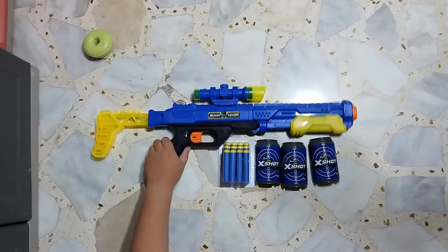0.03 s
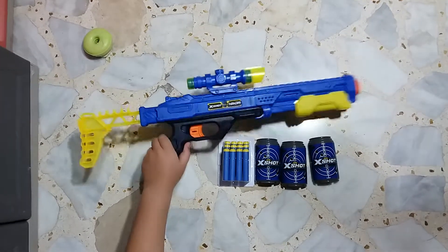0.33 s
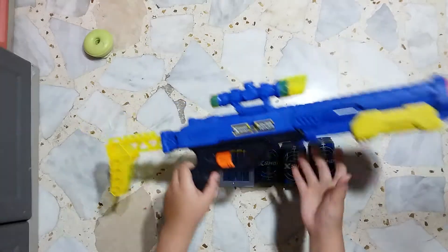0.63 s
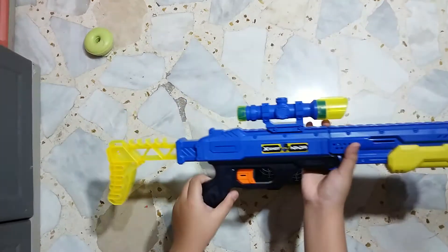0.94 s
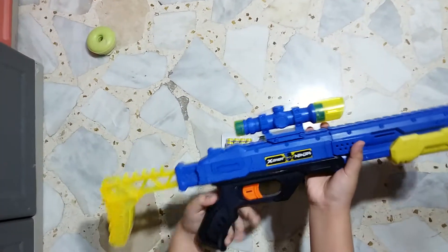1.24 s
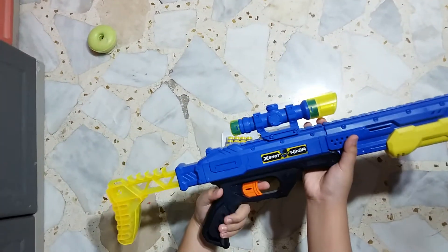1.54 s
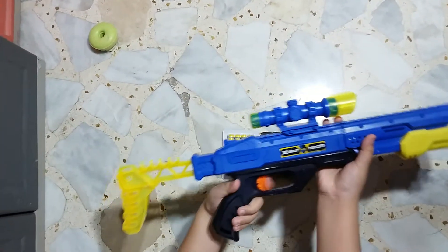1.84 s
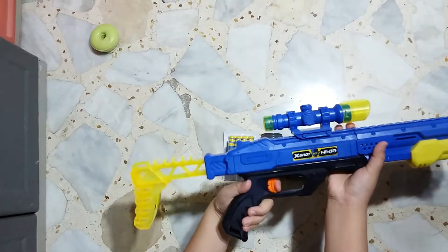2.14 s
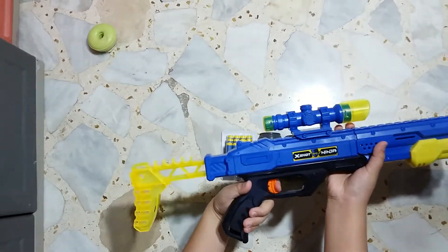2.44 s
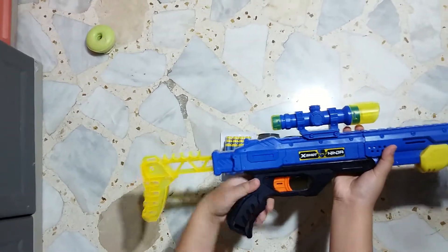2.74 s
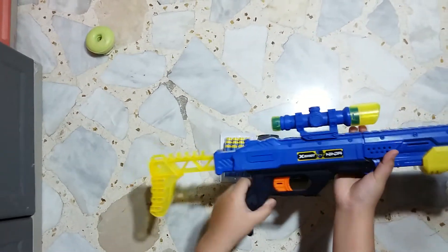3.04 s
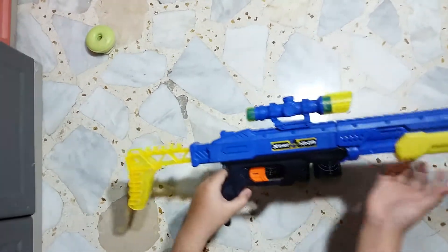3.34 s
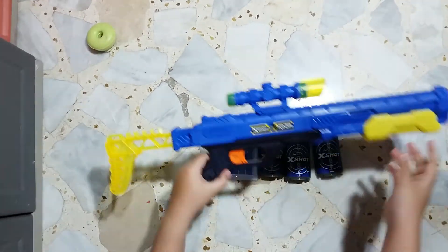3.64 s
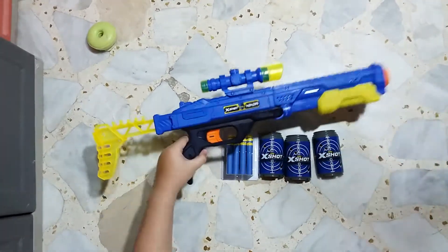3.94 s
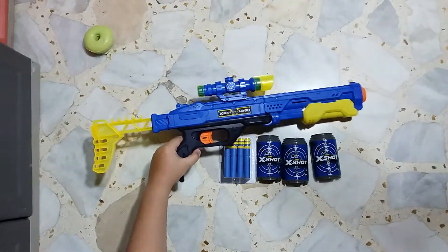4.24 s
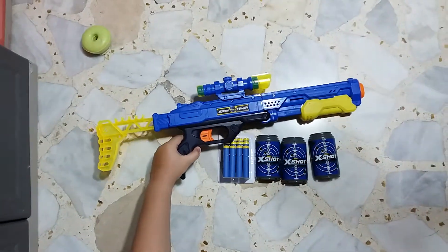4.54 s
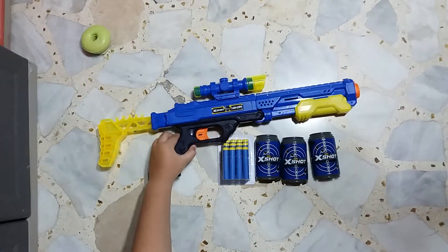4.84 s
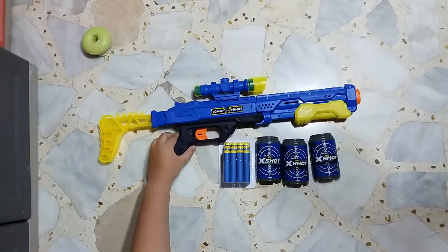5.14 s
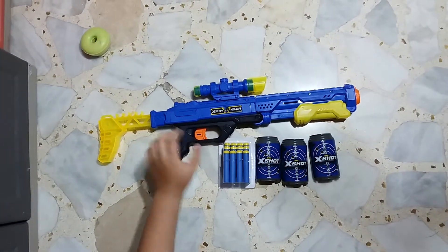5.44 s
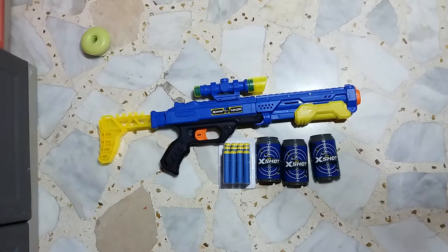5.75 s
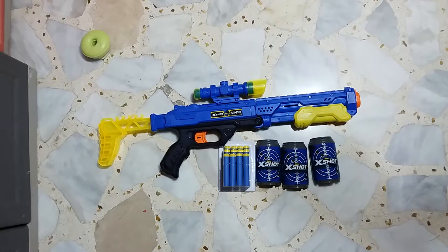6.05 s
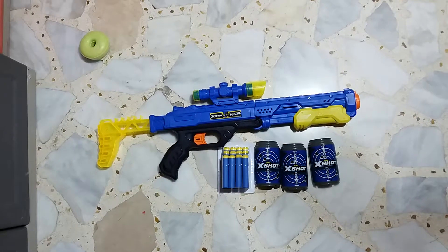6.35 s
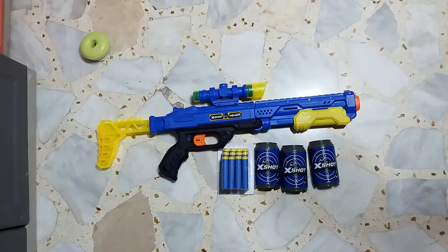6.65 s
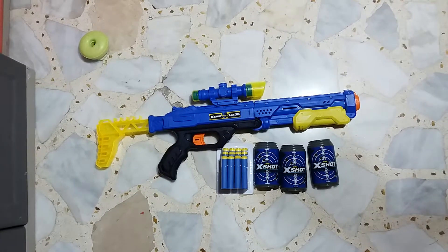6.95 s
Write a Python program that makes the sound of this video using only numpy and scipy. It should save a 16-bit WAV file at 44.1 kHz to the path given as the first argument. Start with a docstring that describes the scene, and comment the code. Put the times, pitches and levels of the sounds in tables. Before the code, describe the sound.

A hollow plastic toy blaster is lifted with soft rubs and small bumps in the first 0.3 seconds, followed by faint handling ticks. It is then fired empty three times, at about 1.75, 2.1 and 2.45 seconds. Each shot starts with a slight trigger creak and lands as a loud, sharp plastic clack with a very quick rebound. A lighter, bright click of the trigger returning follows each one, at about 2.0, 2.35 and 2.7 seconds. Quiet rubbing of hands continues, with a soft bump near 3.5 seconds. From 4.4 to 5.4 seconds the toy is laid on a tile floor with several light, hollow knocks and a brief scrape, the clearest knock at 5.15. A few faint ticks and rubs trail off by 7 seconds. It all sounds close, in a small hard room with short reverberation and a low steady hum.

```python
"""A hollow plastic toy blaster is lifted, fired three times with no darts, and laid on a tile floor.
Each pull frees a sprung plunger that slams home and rebounds; the trigger then clicks back.
These impacts, like the knocks and friction of hands and floor, are broadband excitations
filtered by the resonant modes of the shell. A small hard room with a low hum reverberates."""
import sys
import numpy as np
from scipy import signal
from scipy.fft import rfft, irfft
from scipy.io import wavfile
from scipy.ndimage import uniform_filter1d

SR = 44100
rng = np.random.default_rng(int(sys.argv[2]) if len(sys.argv) > 2 else 0)


def unload_audio(sound):
    """Save the sound as a 16-bit wav file, at the path given as the first command line argument."""
    columns = np.transpose(np.atleast_2d(sound))
    # keep every value between -1 and 1, then stretch to whole-number steps
    steps = np.round(np.clip(columns, -1, 1) * 32767)
    wavfile.write(sys.argv[1], SR, steps.astype(np.int16))


N = 313434
SIZE = 16384  # samples in one contact sound
T, HZ = np.arange(SIZE) / SR, np.fft.rfftfreq(SIZE, 1 / SR)

# sharp modes of the cavity and plunger tube: (frequency [Hz], width [Hz], unscaled peak [dB])
CAVITY_MODES = [(430, 25, 7), (495, 44, 7.5), (615, 40, 4.5), (670, 13, 10), (778, 25, 2.5), (890, 37, 11),
                (1080, 30, 1.5), (1122, 20, 4.5), (1192, 20, 9.5), (1260, 34, 7.5), (1366, 33, 5.5),
                (1550, 28, 1.5), (1650, 42, 7), (1774, 31, 6.5), (2030, 34, 8), (2080, 36, 1),
                (2270, 21, 9), (2345, 28, 5), (2480, 67, 5.5), (2680, 26, 6.5), (3236, 40, 8.5),
                (3480, 55, -1), (4640, 48, 6), (7470, 50, 4), (7602, 59, 8), (7940, 97, 7.5)]
# broad modes of the outer walls: (frequency [Hz], width [Hz], unscaled peak [dB])
WALL_MODES = [(580, 280, 9), (964, 240, 13.5), (1707, 60, 10), (1898, 91, 11), (2142, 150, 10),
              (2600, 190, 4.5), (3290, 131, 4), (3618, 82, 4.5), (4310, 110, 6), (4940, 300, 0.5)]


def amp(db):
    """Decibels to amplitude ratio."""
    return 10 ** (np.asarray(db) / 20)


def unit(x):
    """Normalises to an rms of one."""
    return x / np.sqrt(np.mean(x ** 2) + 1e-20)


def read(points, hz):
    """Interpolates a table on a log-frequency axis."""
    f, value = np.transpose(points)
    return np.interp(np.log(hz + 1), np.log(f + 1), value)


def add(mix, s, sound):
    """Superposes a sound on the mix at s seconds."""
    part = mix[max(round(s * SR), 0):][:len(sound)]
    part += sound[:len(part)]


def fade(t, t60):
    """Exponential decay of 60 dB in t60 seconds."""
    return np.exp(-np.log(1000) * t / np.maximum(t60, 1e-3))


def resonance(hz, centre_hz, width_hz):
    """Lorentzian resonance curve, 1 at its centre."""
    return 1 / (1 + (2 * (hz - centre_hz) / width_hz) ** 2)


def modes_db(modes):
    """Modal response: one resonance peak per mode, summed in decibels."""
    return sum(db * resonance(HZ, hz, width) for hz, width, db in modes)


def colour(x, db):
    """Minimum-phase filter with the gain db: narrow peaks ring on after the excitation."""
    log_gain = np.log(amp(db))
    response = np.exp(np.conj(signal.hilbert(np.r_[log_gain, log_gain[-2:0:-1]])))
    return irfft(rfft(x) * response[:len(HZ)])


def treble(corner_hz=4000):
    """High shelf, from 0 in the bass to 1 in the treble."""
    return 1 / (1 + (corner_hz / (HZ + 1)) ** 4)


def room_noise(noise_db=-57.5):
    """Stationary broadband noise, and a hum that wavers because it is narrow-band noise."""
    # room noise spectrum: (frequency [Hz], relative spectral level [dB])
    spectrum = [(25, -22.5), (44, -17.5), (58, -5), (85, -5), (130, -3.5), (270, -4), (390, 2), (600, -5),
                (950, -6), (1800, -12), (3000, -20), (6500, -30.5), (10000, -32), (15500, -26.5)]
    # bands of the hum: (frequency [Hz], width [Hz], level [dB])
    hum_bands = [(85, 26, -70.5), (156.8, 8.1, -71.5), (234.2, 11, -65.5)]
    hz = np.fft.rfftfreq(N, 1 / SR)
    noise = lambda gain: unit(irfft(rfft(rng.standard_normal(N)) * gain, N))
    hum = sum(amp(db) * noise(resonance(hz, band_hz, width)) for band_hz, width, db in hum_bands)
    return amp(noise_db) * noise(amp(read(spectrum, hz))) + hum


def room_tail(build_s=0.0022):
    """Diffuse reverberation: reflections build up quickly, then each band decays at its own rate."""
    # decay of the room: (frequency [Hz], reverberation time [s])
    reverb_times = [(200, 0.28), (600, 0.1), (1100, 0.19), (2000, 0.17), (4500, 0.21), (8000, 0.19),
                    (14000, 0.17)]
    hz, t, bands = signal.stft(rng.standard_normal(SIZE), SR, nperseg=256)
    bands = bands * fade(t, read(reverb_times, hz)[:, None])
    tail = signal.istft(bands, SR, nperseg=256)[1][:SIZE]
    return unit(tail * (1 - np.exp(-(T / build_s) ** 2)))


def rub(length, level_db, centre_hz, slips_per_s=1800, ring=0.71, skirt_db=6, room_db=-2):
    """Stick-slip friction: tiny random slips excite the shell's modes and the room."""
    # skin sliding on plastic: (frequency [Hz], gain [dB])
    spectrum = [(500, 5), (5500, -2), (6700, -3.5), (8100, -1), (9500, -5.5), (15000, -4.5)]
    body_db = ring * (modes_db(CAVITY_MODES) + modes_db(WALL_MODES)) + read(spectrum, HZ)
    stroke = np.sin(np.pi * np.minimum(T / length, 1)) ** 2
    slips = rng.standard_normal(SIZE) * (rng.random(SIZE) < slips_per_s / SR) * stroke
    reflections = unit(signal.fftconvolve(slips, room_tail())[:SIZE])
    excitation = unit(slips) + amp(room_db) * reflections
    band_db = -skirt_db * np.minimum(np.log2((HZ + 1) / centre_hz) ** 2, 6)
    return amp(level_db) * unit(colour(excitation, band_db + body_db)) * np.sqrt(np.mean(stroke ** 2))


def rubs():
    """Sliding friction as hands shift their grip and the shell moves on the floor."""
    # strokes of skin or tile: (midpoint [s], duration [s], level [dB], band centre [Hz])
    strokes = [(0.02, 0.066, -52.5, 1570), (0.186, 0.17, -45.5, 1670), (0.25, 0.14, -64.5, 7300),
               (.671, 0.065, -68.5, 5000), (0.899, .11, -65, 2020), (1.046, .13, -59.5, 2530),
               (1.247, .13, -63, 3600), (1.677, .056, -48.5, 3060), (2.851, 0.28, -61, 2800),
               (3.302, 0.059, -60.5, 3500), (3.82, .072, -59.5, 6000), (4.03, .11, -60.5, 4440),
               (4.168, 0.092, -68.5, 4460), (4.813, 0.14, -53.5, 1400), (4.943, .08, -45, 1750),
               (5.9, .3, -74, 8000), (6.44, .26, -73, 8000), (6.773, 0.12, -62, 5120),
               (6.932, 0.082, -63.5, 4030)]
    out = np.zeros(N)
    for s, length, db, centre_hz in strokes:
        add(out, s - length / 2, rub(length, db, centre_hz))
    return out


def impact(level_db, decay, colour_db, room_db, rise, crack):
    """Source and filter: a snap, plastic chatter and their reflections ring through the shell."""
    # long contacts are scrapes and start softly
    contact = fade(T, decay) * (1 - fade(T, rise * decay))
    chatter = unit(rng.standard_normal(SIZE) * contact)
    # short contacts are hard and have a stronger snap
    snap = unit(rng.standard_normal(SIZE) * fade(T, 0.0036) * (1 - fade(T, 0.0018)))
    snap *= crack * fade(decay, 0.29)
    spectrum = rfft(snap + chatter + amp(room_db) * room_tail())
    # the contact feeds all bands alike, so the colour is the shell's alone
    spectrum /= np.sqrt(uniform_filter1d(abs(spectrum) ** 2, size=35) + 1e-9)
    burst = irfft(spectrum) * np.clip(3 - 4 * T / T[-1], 0, 1)  # silent in the last quarter
    # same energy as an rms of level_db held for 35 ms
    return amp(level_db) * unit(colour(burst, colour_db)) * np.sqrt(.035 / T[-1])


def knock(level_db, decay, treble_db, spot_hz, spot_db,
          ring=0.28, wall_ring=1.066, room_db=-1.0, spot_octaves=0.26, rise=.45, crack=.15):
    """Modal excitation from outside: the spot struck favours one band of the shell's modes."""
    # a bump on the shell: (frequency [Hz], gain [dB])
    spectrum = [(60, -25), (250, -13.5), (450, -14.5), (740, -11.5), (1120, -8), (1450, -1), (2000, -8),
                (2500, -6), (3400, -9), (5200, -17.5), (7500, -21.5), (10000, -27.5), (15500, -38.5)]
    body_db = read(spectrum, HZ) + wall_ring * modes_db(WALL_MODES) + ring * modes_db(CAVITY_MODES)
    spot = np.exp(-(np.log2((HZ + 1) / spot_hz) / spot_octaves) ** 2)
    return impact(level_db, decay, body_db + treble_db * treble() + spot_db * spot, room_db, rise, crack)


def knocks():
    """Light impacts as the shell bumps against the hands and rocks into place."""
    # bumps: (time [s], level [dB], contact decay [s], treble [dB], spot band [Hz], spot boost [dB])
    bumps = [(.091, -47, 0.056, 1.5, 2690, 1), (.142, -43.5, 0.065, -0.5, 2900, 4.5),
             (.25, -48.5, 0.063, 0, 2130, 3), (1.11, -56, 0.019, 13, 1740, 21),
             (1.347, -55, 0.02, 6, 1240, 12), (1.515, -60.5, .016, -4, 2380, 1),
             (1.6495, -45, .07, 6.5, 2520, 3), (3.539, -43, .055, 1, 938, 3.5),
             (3.565, -50.5, .03, 5, 2293, .5), (4.653, -46, 0.058, -2, 953, 14.5),
             (4.67, -53, .022, 6, 5800, 3), (4.995, -46.5, .02, -5, 2280, 11),
             (5.086, -56.5, .023, 1, 2520, 7), (5.108, -54.5, .027, 4, 1300, 11),
             (5.125, -54, .025, -9, 1250, 1), (5.237, -49.5, .015, -12, 1290, 12),
             (5.7955, -47.5, 0.012, -4, 970, 7.5), (6.062, -54, .019, -8.5, 1780, 2),
             (6.185, -60.5, .02, -16, 1730, 4.5)]
    out = np.zeros(N)
    for s, *contact in bumps:
        add(out, s, knock(*contact))
    return out


def landings(edge_decay_s=0.035):
    """Double impacts on tile: one edge touches, then the weight follows on the same spot."""
    # floor contacts: (time [s], level [dB], contact decay [s], treble [dB], spot band [Hz],
    # spot boost [dB], edge lead [s], edge level [dB])
    contacts = [(4.365, -37, 0.022, 4.5, 2030, 6, .009, -35),
                (4.7, -36.5, 0.021, -5.5, 1104, 16.5, .0045, -36.5),
                (4.899, -39.5, 0.049, -4, 2740, 4.5, .008, -55),
                (5.15, -31.5, 0.012, 4, 955, 3, .007, -38.5),
                (5.35, -51.5, .048, 2.5, 1580, 7.5, .011, -55.5)]
    out = np.zeros(N)
    touch = lambda *contact: knock(*contact, wall_ring=1.0, room_db=-4, spot_octaves=0.29, rise=0.38)
    for s, db, decay, treble_db, spot_hz, spot_db, edge_s, edge_db in contacts:
        add(out, s - edge_s, touch(edge_db, edge_decay_s, treble_db, spot_hz, spot_db))
        add(out, s, touch(db, decay, treble_db, spot_hz, spot_db))
    return out


def strike(body_db, level_db, decay, bass_db, treble_db, room_db, rise, crack, bass_hz=1200):
    """Impulsive excitation from inside: a sprung part strikes its stop."""
    tone_db = bass_db / (1 + (HZ / bass_hz) ** 2) + treble_db * treble()
    return impact(level_db, decay, body_db + tone_db, room_db, rise, crack)


def trigger_returns(ring=.49, glide_s=.11, glide_db=-1, glide_lead_s=.068):
    """A spring's restoring force slides the trigger forward, over its catch and home with a click."""
    # trigger impacts: (frequency [Hz], gain [dB])
    spectrum = [(60, -36.5), (300, -21.5), (600, -13), (900, -7), (1900, -7.5), (3000, -2.5), (3700, 0),
                (5000, 0.5), (5700, -6), (8000, -4.5), (10000, -14), (12700, -6.5), (15000, -22)]
    # trigger releases: (click time [s], level [dB], catch lead [s], catch treble [dB],
    # slide lead [s], slide level [dB])
    releases = [(2.0177, -28.5, .0018, -8, 0.091, -38), (2.344, -28.5, .0018, -3, 0.09, -41),
                (2.6718, -31, .004, -26, .076, -44)]
    out = np.zeros(N)
    body_db = read(spectrum, HZ) + ring * modes_db(CAVITY_MODES)
    hit = lambda db, **tone: strike(body_db, db, **tone, room_db=-1.0, rise=.26, crack=.24)
    for s, db, catch_s, catch_treble_db, slide_s, slide_db in releases:
        add(out, s - slide_s - glide_lead_s, rub(glide_s, slide_db + glide_db, centre_hz=2900))
        add(out, s - slide_s, knock(slide_db, decay=.078, treble_db=13, spot_hz=2944, spot_db=6.5))
        add(out, s - catch_s, hit(db=-36, decay=0.037, bass_db=-9.5, treble_db=catch_treble_db))
        add(out, s, hit(db, decay=0.024, bass_db=2.5, treble_db=1.6))
    return out


def shots(ring=0.81, drag_s=0.048, drag_db=-7.5, drag_lead_s=0.046):
    """The trigger creaks with friction, then the spring's stored energy drives the plunger's impacts."""
    # plunger impacts: (frequency [Hz], gain [dB])
    spectrum = [(40, -32.5), (120, -20), (270, -19.5), (400, -13.5), (520, -7), (1100, -1), (1500, -3),
                (2400, -1), (4200, -3), (5600, -7.5), (7500, -9), (10000, -12.5), (15500, -16)]
    # trigger pulls: (slam time [s], level [dB], bass [dB], treble [dB], decay factor [ratio],
    # squeeze lead [s], squeeze level [dB])
    pulls = [(1.7505, -17, -2, -2, 0.89, .038, -41), (2.1138, -17.5, -0.5, -1, 1.1, 0.032, -36.5),
             (2.4608, -18, 0, 0, 1.03, 0.04, -38)]
    # the catch lets go, the plunger slams and rebounds, the spring settles:
    # (time from slam [s], relative level [dB], base decay [s], added bass [dB], added treble [dB])
    plunger_stroke = [(-.0024, -17.5, .033, -2, -3), (0, -.5, .025, -3, 0), (0.0122, 0.07, .046, 3.5, 0.5),
                      (.0255, -10, .063, -0.5, 2.5)]
    out = np.zeros(N)
    body_db = read(spectrum, HZ) + ring * modes_db(CAVITY_MODES)
    for s, db, bass_db, treble_db, decay_factor, squeeze_s, squeeze_db in pulls:
        add(out, s - squeeze_s - drag_lead_s, rub(drag_s, squeeze_db + drag_db, centre_hz=1202))
        add(out, s - squeeze_s, knock(squeeze_db, decay=.058, treble_db=8.0, spot_hz=596.2, spot_db=7.5))
        for delay, part_db, decay, part_bass_db, part_treble_db in plunger_stroke:
            hit = strike(body_db, db + part_db, decay_factor * decay, bass_db + part_bass_db,
                         treble_db + part_treble_db, room_db=-.5, rise=.1, crack=.7)
            add(out, s + delay, hit)
    return out


def scene():
    """Superposition of the room noise, the blaster's action and its handling, in mono."""
    return (room_noise() + shots() + trigger_returns() + landings() + knocks() + rubs())[None]


def record(dry, port_hz=7900, port_q=7, port_gain=1.2, cutoff_hz=15850):
    """The microphone port resonates in the treble; overload clips peaks; a low-pass limits the band."""
    port_ring = signal.lfilter(*signal.iirpeak(port_hz, port_q, fs=SR), dry)
    clipped = np.clip(dry + port_gain * port_ring, -1, 1)
    low_pass = signal.firwin(255, cutoff_hz, window=("kaiser", 8), fs=SR)
    return signal.oaconvolve(clipped, low_pass[None], "same")


dry = scene()
out = record(dry)
unload_audio(out)
```